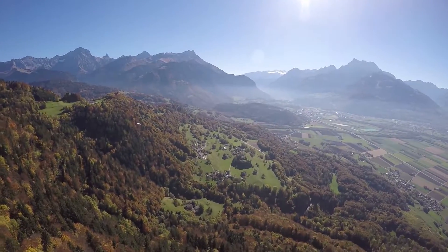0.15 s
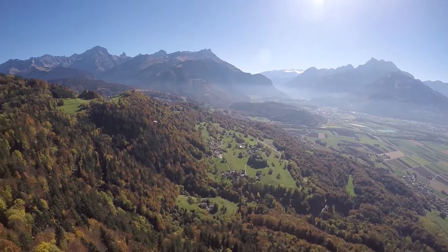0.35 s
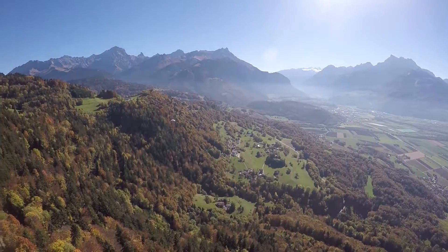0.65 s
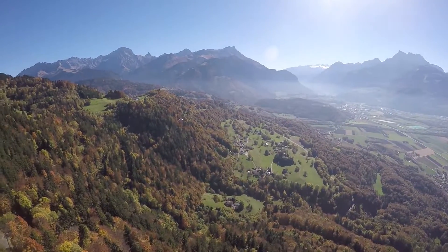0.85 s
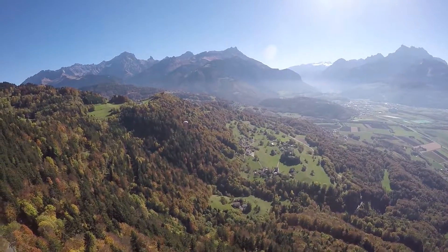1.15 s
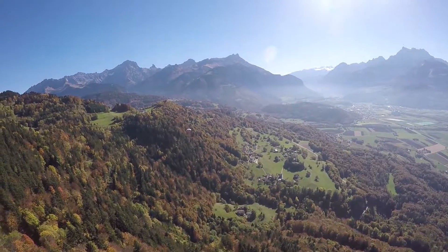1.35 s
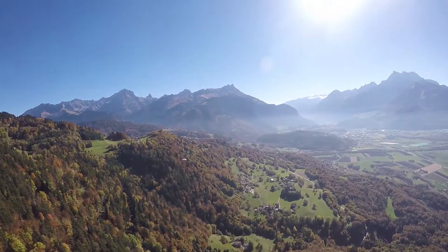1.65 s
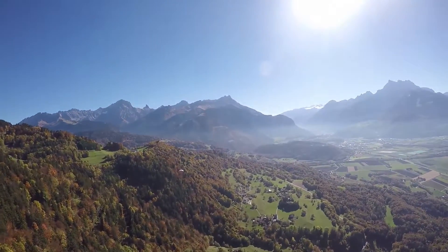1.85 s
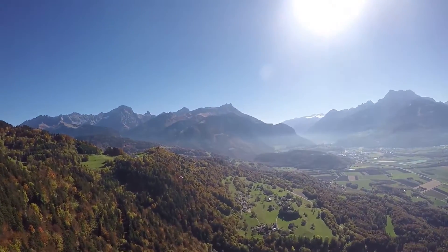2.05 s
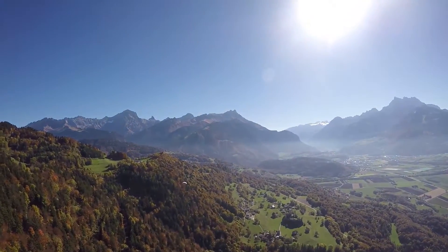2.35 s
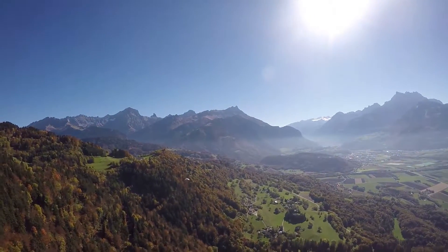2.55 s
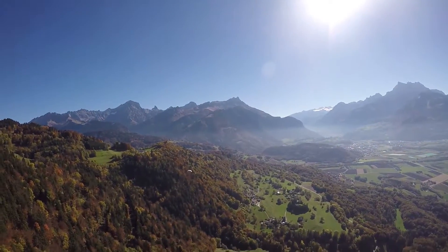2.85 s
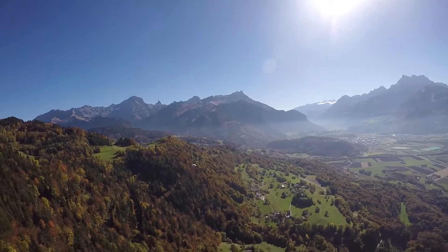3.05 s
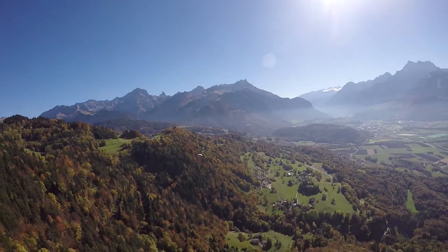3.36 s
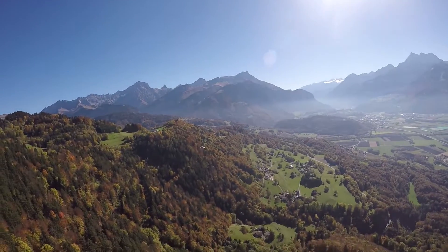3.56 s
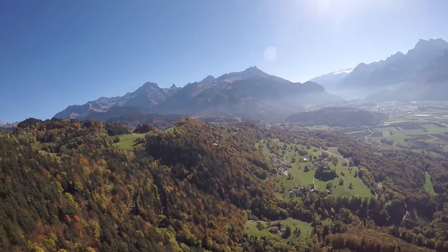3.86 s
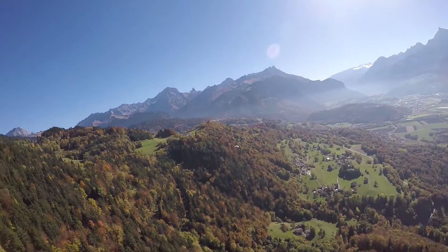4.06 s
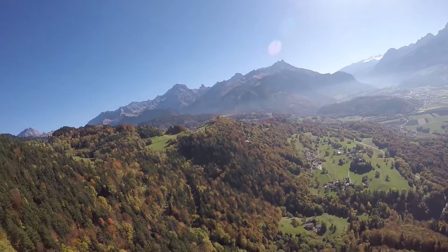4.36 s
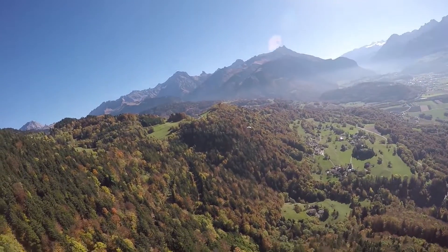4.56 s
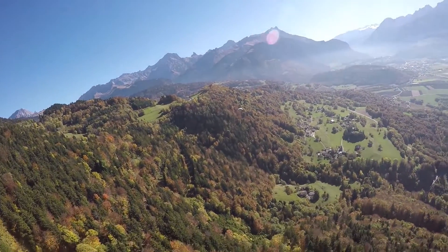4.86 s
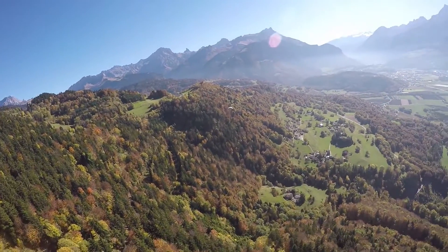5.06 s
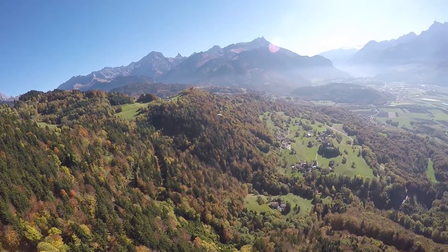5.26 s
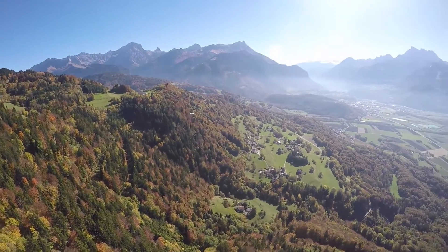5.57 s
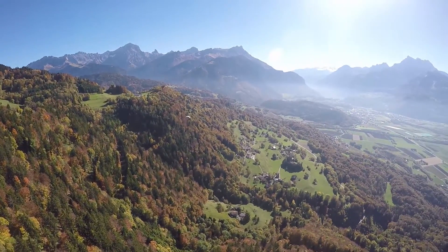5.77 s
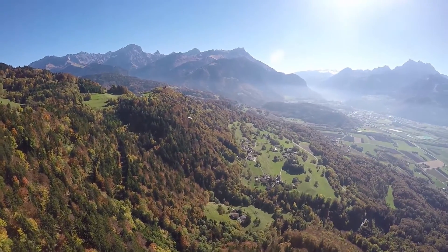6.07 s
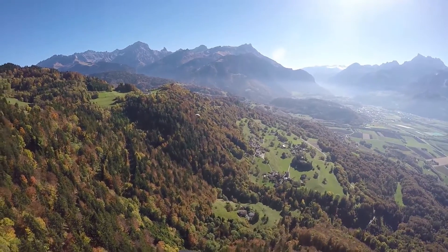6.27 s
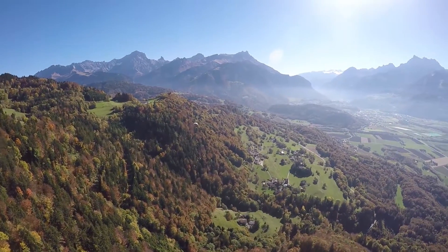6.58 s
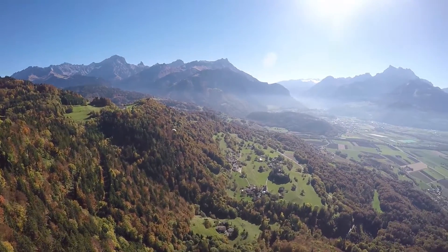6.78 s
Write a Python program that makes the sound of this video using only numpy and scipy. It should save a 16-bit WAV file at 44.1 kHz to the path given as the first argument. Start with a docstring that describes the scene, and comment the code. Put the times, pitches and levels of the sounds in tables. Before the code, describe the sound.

Wind rushes steadily over a small microphone during gliding flight high above a mountain valley. A deep, fluttering rumble dominates, with a lighter hiss and tiny snaps on top. Midway the hiss eases and a harness close by rustles softly, shaking a metal buckle. A mild gust swishes past, a strap gives a few faint, high squeaks, and the rush builds again near the end.

```python
"""In the open air, in gliding flight: wind rushes over a small camera microphone.
Slow pressure swings buffet the port and eddies roar; the finest hiss, snap and ring the port's cavity.
The harness rustles and shakes a buckle, a side gust passes, a strap squeaks by stick-slip.
Gain control and a limiter hold the level; a faint high hiss lies on top."""
import sys
import numpy as np
from scipy import signal
from scipy.fft import rfft, irfft, next_fast_len
from scipy.io import wavfile
from scipy.ndimage import uniform_filter1d, minimum_filter1d, map_coordinates

SR = 44100
rng = np.random.default_rng(int(sys.argv[2]) if len(sys.argv) > 2 else 0)


def dump(signal):
    """Clip the signal to [-1, 1] and save it as 16-bit WAV at the path in sys.argv[1]."""
    limited = np.clip(np.atleast_2d(signal).T, -1, 1)
    pcm = np.round(limited * 32767).astype(np.int16)
    wavfile.write(sys.argv[1], SR, pcm)


N = 305172

# Noise spectra. Each row: frequency in Hz, relative density in dB.
BUFFET_SPECTRUM = [(10, -29.5), (22, -5), (33, -4.5), (50, -7), (75, -15.5), (130, -32), (300, -87)]
THROB_SPECTRUM = [(30, -37), (65, -0.5), (90, -0.5), (200, -4), (300, -8), (500, -25.5), (1000, -87.5)]
ROAR_SPECTRUM = [(120, -31), (260, -2), (350, 0), (720, -3.5), (920, -8), (1290, -20), (2000, -42),
                 (4000, -100)]
HISS_SPECTRUM = [(500, -20), (1200, -1.5), (1700, -1.5), (2100, -5.5), (2500, -10), (3500, -13.5),
                 (4500, -21.5), (5000, -27.5), (6000, -35.5), (9000, -81.5)]
FIZZ_SPECTRUM = [(2500, -32.5), (4500, -5.5), (6000, -1.5), (7000, -4.5), (7900, -6), (8500, -9.5),
                 (9500, -11.5), (12000, -25.5), (16000, -49)]
SHEEN_SPECTRUM = [(8000, -34), (10500, -1), (12500, -6), (14200, -4), (14600, -30)]
SIZZLE_SPECTRUM = [(9000, -30), (11000, -7), (12500, -2), (14800, 0), (15300, -10)]
SNAP_SPECTRUM = [(3000, -24), (5500, -1), (7000, 2), (9000, -8), (12000, -15), (14000, -26), (16000, -49)]
CLOTH_SPECTRUM = [(1000, -30), (2000, -3), (2800, 0), (3500, -3), (4100, -13), (5600, -20), (6200, -31),
                  (12000, -70)]
GUST_SPECTRUM = [(1500, -9.5), (2500, 4.5), (3500, -1.5), (4500, 0.5), (5700, -5), (6500, -20),
                 (9000, -45.5)]
# Resonances. Each row: frequency in Hz, width in Hz, gain in dB, all before squaring.
BUCKLE_MODES = [(2580, 280, 0), (2900, 280, -1), (3350, 320, -1), (4450, 340, -3.5), (5430, 380, -10),
                (6550, 400, -19)]
GRIT_MODES = [(4550, 400, 0), (5050, 400, -3)]
# Low wind. Each row: time in seconds, then buffet, throb and roar levels in dB.
LOW_LEVELS = [(0, -19.5, -19, -19), (.75, -20.5, -20.5, -24.5), (1.3, -21, -20.5, -23.5),
              (1.7, -25, -19.5, -22), (2.3, -21, -21, -22), (2.7, -23.5, -20.5, -22.5),
              (3.1, -25, -18.5, -23), (3.5, -19, -20.5, -24), (4.0, -21.5, -21, -27.5),
              (4.15, -22.5, -20.5, -24), (4.27, -25, -21.5, -23), (4.38, -22, -21, -27.5),
              (4.5, -21, -20.5, -26), (4.75, -22, -22.5, -29), (5.0, -20, -21, -29.5),
              (5.25, -22.5, -22, -27.5), (5.5, -21, -21.5, -26.5), (5.95, -20.5, -20, -21.5),
              (6.92, -22.5, -19.5, -22.5)]
# Big pressure swings. Each row: time in seconds, buffet boost in dB.
THUMPS = [(.02, 10.5), (1.39, 6), (4.18, 4.5), (4.94, 4), (5.38, 5.5), (5.9, 4)]
# Throb dips. Each row: time in seconds, depth in dB (negative swells).
THROB_DIPS = [(4.15, -3.5), (4.21, 5.5), (4.35, 11.5), (4.93, 4), (5.06, 2.5)]
# Airflow strength. Each row: time in seconds, rush in dB, treble over rush in dB.
AIRFLOW = [(0, -38.5, -22.5), (.15, -38, -22.5), (.42, -40.5, -25), (.56, -40.5, -22.5), (.67, -43, -27),
           (.76, -45.5, -26), (1.25, -44.5, -25.5), (1.38, -39.5, -26.5), (1.57, -44.5, -25),
           (1.66, -40.5, -25.5), (1.85, -40.5, -23), (2.25, -41, -23), (2.75, -42.5, -26),
           (3.0, -44.5, -25.5), (3.4, -47, -26.5), (3.9, -49.5, -25), (4.08, -43.5, -26.5),
           (4.6, -42, -29.5), (4.78, -48.5, -26.5), (5.25, -50.5, -26.5), (5.38, -52, -26.5),
           (5.6, -49, -26), (5.83, -45, -27), (5.93, -40, -25), (6.74, -43, -25), (6.84, -42.5, -23),
           (6.92, -38, -21.5)]
# Treble dips. Each row: time in seconds, depth in dB.
TREBLE_DIPS = [(.49, 6), (.78, 4), (.92, 1.5), (1.31, 6.5), (5.4, 6), (5.81, 5), (6.29, 4)]
# Top-octave hiss. Each row: time in seconds, level in dB.
SHEEN_LEVELS = [(0, -81), (.5, -88.5), (2.8, -83.5), (3.6, -82), (5.8, -80), (6, -86.5), (6.92, -85)]
# Sizzle swells. Each row: start in seconds, end in seconds, level in dB.
SIZZLE_SWELLS = [(.84, 1.33, -71), (6.72, 7.1, -73)]
# Distinct snaps at the port. Each row: time in seconds, relative level in dB.
SNAPS = [(0.1241, -43), (0.1446, -42), (0.181, -47), (0.195, -48), (0.227, -49), (0.262, -49),
         (0.2753, -45), (0.4494, -50.5), (0.4794, -56), (0.5172, -51), (0.5377, -49), (0.5694, -53),
         (0.5894, -50), (0.6094, -51), (0.6459, -54), (0.8255, -56), (0.8594, -58), (0.9622, -57),
         (1.3633, -55), (1.6626, -52), (1.6796, -46), (1.7719, -49), (1.9265, -47), (1.947, -50),
         (2.0981, -49), (2.2608, -45), (2.4433, -47), (2.4798, -51), (2.5381, -55), (2.7242, -46.5),
         (2.7726, -50), (5.776, -51), (5.8651, -54), (6.0003, -54), (6.0377, -47), (6.2023, -51),
         (6.2881, -53), (6.3131, -49), (6.3949, -52), (6.4602, -51), (6.839, -50)]
# Harness rustles. Each row: start in seconds, peak in dB, buckle over cloth in dB.
RUSTLES = [(3.19, -53, -8), (3.208, -48, -6), (3.266, -57, 3), (3.304, -58, 3), (3.34, -52, -2),
           (3.366, -55, 2), (3.395, -52, -8), (3.532, -48, -3), (3.579, -50, -3), (3.606, -55, -8),
           (3.627, -52, -2), (3.655, -58, -4), (3.677, -53, -3), (3.95, -56, -3), (4.722, -54, -8),
           (4.896, -57, -10), (5.12, -50.5, -10), (5.134, -52.5, -10), (5.405, -57, -16),
           (5.428, -48.5, -13), (5.444, -54, -12), (5.517, -51.5, -12), (5.53, -52.5, -9),
           (5.565, -54, -10), (5.871, -56, -12)]
# Strap chirps. Each row: start and length in seconds, start and end pitch in Hz, level in dB,
# octave over tone in dB.
CHIRPS = [(4.77, .028, 2440, 2520, -47, -23), (4.801, .022, 2450, 2540, -45, -22),
          (4.825, .014, 2500, 2440, -51, -20), (4.843, .031, 2350, 2800, -46, -21),
          (4.884, .016, 2800, 2930, -50, -26), (4.906, .01, 2900, 2800, -55, -20),
          (4.944, .013, 3000, 2900, -52.5, -30), (4.963, .01, 2950, 2920, -54, -30),
          (4.98, .014, 3250, 3320, -53.5, -30), (5.022, .015, 2860, 2900, -52, -30)]


def amp(db):
    """Decibels to gain."""
    return 10 ** (np.asarray(db) / 20)


def unit(x):
    """Scale to rms 1."""
    return x / np.sqrt(np.mean(x ** 2) + 1e-20)


def curves(rows):
    """Per-sample curve for each column after the time."""
    times_s, *columns = np.transpose(rows)
    return [np.interp(np.arange(N) / SR, times_s, column) for column in columns]


def wobble(rate_hz):
    """Smooth random curve with knots at rate_hz."""
    return map_coordinates(rng.standard_normal(4000), [np.arange(N) * rate_hz / SR], mode="wrap")


def bumps(rows, half_width_s):
    """Bell-shaped level changes in dB."""
    t = np.arange(N) / SR
    return sum(db * np.exp(-((t - at_s) / half_width_s) ** 2) for at_s, db in rows)


def span(start_s, end_s, db, edge_s):
    """Gain that rises, holds and falls."""
    t = np.arange(N) / SR
    return amp(db) * np.clip(np.minimum(t - start_s, end_s - t) / edge_s, 0, 1)


def filtered(x, response):
    """Apply a frequency response."""
    size = next_fast_len(N + SR // 2)
    return irfft(rfft(x, size) * response(np.fft.rfftfreq(size, 1 / SR)), size)[..., :N]


def coloured(x, spectrum):
    """Shape x by a spectrum on a log frequency axis; rms 1."""
    hz, db = np.transpose(spectrum)
    return unit(filtered(x, lambda f: amp(np.interp(np.log(f + 1), np.log(hz + 1), db))))


def resonant_noise(modes, flutter_db=0):
    """Noise through the squared sum of modes: sharp peaks, dark valleys; rms 1."""
    def response(f):
        return sum(amp(db) * 1j * f * width_hz / (hz * hz - f * f + 1j * f * width_hz)
                   for hz, width_hz, db in modes)
    return unit(filtered(amp(flutter_db) * rng.standard_normal(N), lambda f: response(f) ** 2))


def patchy_noise(spectrum, patch_db, flutter_db):
    """Fluttering noise with random gain patches in time and frequency; rms 1."""
    bins = signal.stft(rng.standard_normal(N), nperseg=512)[2]
    patches = uniform_filter1d(rng.standard_normal(bins.shape), size=6, axis=0)
    patches = unit(uniform_filter1d(patches, size=10, axis=1))
    noise = signal.istft(bins * amp(patch_db * patches), nperseg=512)[1][:N]
    return coloured(noise * amp(flutter_db), spectrum)


def low_wind(bursts_db):
    """Slow pressure swings buffet the port; eddies throb and roar."""
    buffet_db, throb_db, roar_db = curves(LOW_LEVELS)
    buffet_db += bumps(THUMPS, half_width_s=.065)
    throb_db -= bumps(THROB_DIPS, half_width_s=.052)
    buffet = patchy_noise(BUFFET_SPECTRUM, patch_db=-.15, flutter_db=.18 * wobble(3.3))
    throb = patchy_noise(THROB_SPECTRUM, patch_db=.04, flutter_db=.07 * bursts_db + .67 * wobble(7))
    roar = patchy_noise(ROAR_SPECTRUM, patch_db=.48, flutter_db=.38 * bursts_db + .8 * wobble(6))
    return amp(buffet_db) * buffet + amp(throb_db) * throb + amp(roar_db) * roar


def edge_spits(count):
    """Single eddies at the port's edge: level jumps in dB, 1-2 ms long."""
    position, size = rng.random((count, 2)).T
    jumps_db = np.bincount((position * N).astype(int), 4 + 6 * size, N)
    return np.minimum(np.convolve(jumps_db, np.hanning(round(.003 * SR)), "same"), 9)


def fine_eddies(bursts_db, spits_db):
    """The finest eddies hiss and fizz in bursts and drive the port's cavity."""
    rush_db, treble_db = curves(AIRFLOW)
    flow_db = rush_db - rush_db.mean()
    dip_db = bumps(TREBLE_DIPS, half_width_s=.03)
    fine_db = flow_db + treble_db - treble_db.mean() - dip_db
    jumps_db = spits_db * np.clip((fine_db + 8) / 9, .3, 1)  # faster flow snaps harder
    hiss = patchy_noise(HISS_SPECTRUM, patch_db=.3, flutter_db=.72 * bursts_db + .23 * jumps_db)
    hiss *= amp(-42.5 + flow_db - .33 * dip_db)
    flutter_db = .6 * bursts_db + 1.3 * wobble(300) + .75 * jumps_db + .4 * wobble(15)
    fizz = amp(-68.5 + fine_db) * patchy_noise(FIZZ_SPECTRUM, patch_db=.5, flutter_db=flutter_db)
    return hiss + fizz + port_cavity(fine_db, bursts_db)


def port_cavity(fine_db, bursts_db, mode_hz=2892, width_hz=350):
    """Eddies blow across the port and make its air ring."""
    ring = resonant_noise([(mode_hz, width_hz, 0)], flutter_db=.9 * bursts_db)
    return amp(-54 + .86 * fine_db) * ring


def sheen():
    """Faint top-octave hiss; a brighter sizzle swells twice."""
    swells = sum(span(*row, edge_s=.09) for row in SIZZLE_SWELLS)
    sizzle = patchy_noise(SIZZLE_SPECTRUM, patch_db=1.5, flutter_db=.5 * wobble(30))
    hiss = patchy_noise(SHEEN_SPECTRUM, patch_db=2, flutter_db=.3 * wobble(30))
    return amp(curves(SHEEN_LEVELS)[0]) * hiss + swells * sizzle


def port_snaps(half_width_s=.0009, trim_db=-6):
    """Single eddies snap at the port: short, bright noise pulses."""
    times_s, levels_db = np.transpose(SNAPS)
    centres = np.round((times_s + 2 * half_width_s) * SR).astype(int)
    impulses = np.bincount(centres, amp(levels_db + trim_db), N)
    envelope = np.convolve(impulses, np.hanning(round(3 * half_width_s * SR)), "same")
    return envelope * coloured(rng.standard_normal(N), SNAP_SPECTRUM)


def harness(rise_s=.007):
    """Cloth rustles swell fast and die away; each shakes a metal buckle."""
    t, rustle, shake = np.arange(N) / SR, np.zeros(N), np.zeros(N)
    for start_s, peak_db, buckle_db in RUSTLES:
        age = np.clip((t - start_s) / rise_s, 0, 90)
        puff = amp(peak_db) * age * np.exp(1 - age)
        rustle += puff
        shake += amp(buckle_db) * puff
    shiver = span(start_s=3.1, end_s=3.8, db=-67, edge_s=.1)
    buckle = resonant_noise(BUCKLE_MODES)
    cloth = patchy_noise(CLOTH_SPECTRUM, patch_db=3.5, flutter_db=1.5 * wobble(180))
    return rustle * cloth + (shake + shiver) * buckle


def side_gust(bursts_db):
    """One smooth gust swishes past from the side."""
    swish = patchy_noise(GUST_SPECTRUM, patch_db=.5, flutter_db=.5 * bursts_db)
    return span(start_s=3.93, end_s=4.75, db=-60.5, edge_s=.2) * swish


def strap_squeak():
    """Stick-slip: raspy chirps slide fast, then level off; the rubbing adds grit."""
    t, chirps = np.arange(N) / SR, np.zeros(N)
    waver = 1 + .014 * wobble(500)
    rasp_db = 3.2 * wobble(300)
    breath = .9 + .4 * wobble(500)
    for start_s, length_s, from_hz, to_hz, level_db, octave_db in CHIRPS:
        progress = np.clip((t - start_s) / length_s, 0, 1)
        pitch_hz = from_hz + (to_hz - from_hz) * progress * (2 - progress)
        phase = 2 * np.pi * np.cumsum(pitch_hz * waver) / SR
        envelope = np.sqrt(np.abs(np.sin(np.pi * progress))) * (progress < 1)
        tone = np.sin(phase) + amp(octave_db) * breath * np.sin(2 * phase)
        chirps += amp(level_db + rasp_db) * envelope * tone
    grit = resonant_noise(GRIT_MODES, flutter_db=3 * wobble(200))
    return chirps + span(start_s=4.755, end_s=4.85, db=-62.5, edge_s=.02) * grit


def scene():
    """Wind and harness close to one microphone; the wind bands partly share their bursts."""
    bursts_db = .98 * wobble(45) + 1.57 * wobble(250)
    spits_db = edge_spits(count=90)
    wind = low_wind(bursts_db) + fine_eddies(bursts_db, spits_db) + side_gust(bursts_db) + port_snaps()
    return (wind + harness() + strap_squeak())[None]


def record(dry):
    """Gain control, peak limiter, added sheen, 4 ms fade-out, low-pass."""
    pivot_rms, ceiling, cutoff_hz = .13, .52, 15100
    rms = np.sqrt(np.abs(uniform_filter1d(dry ** 2, size=4000, axis=1)) + 1e-9)
    levelled = dry * (rms / pivot_rms) ** -.3
    needed_gain = np.minimum(1, ceiling / (np.abs(levelled) + 1e-9))
    held_gain = minimum_filter1d(needed_gain, size=600, axis=1)
    limited = levelled * uniform_filter1d(held_gain, size=300, axis=1)
    fade = np.minimum(1, np.arange(N)[::-1] / (.004 * SR))
    return filtered((limited + sheen()) * fade, lambda hz: hz < cutoff_hz)


dry = scene()
out = record(dry)
dump(out)
```